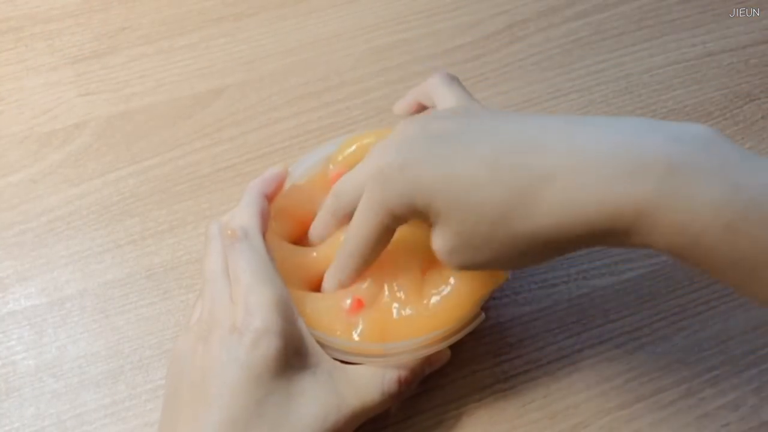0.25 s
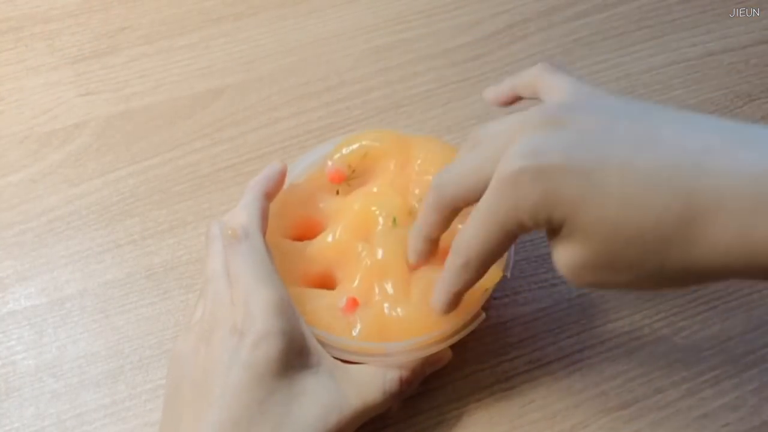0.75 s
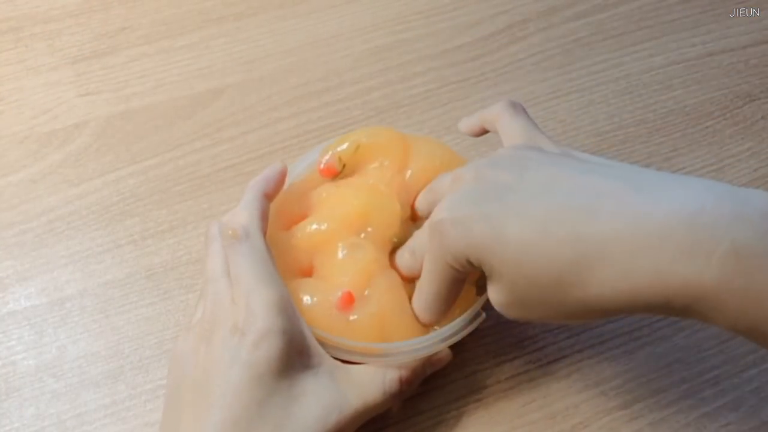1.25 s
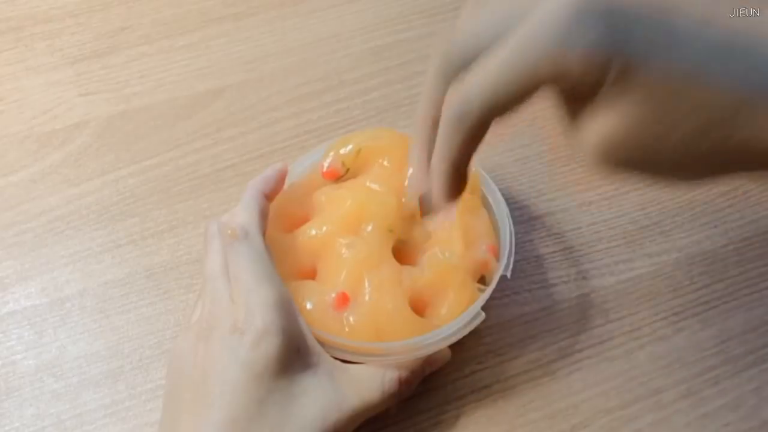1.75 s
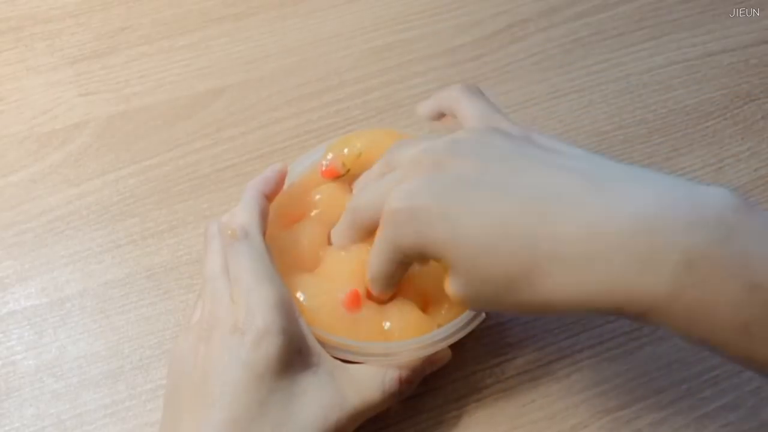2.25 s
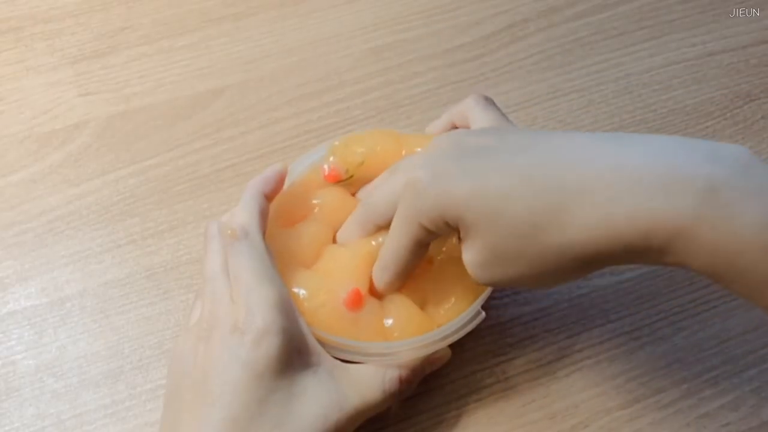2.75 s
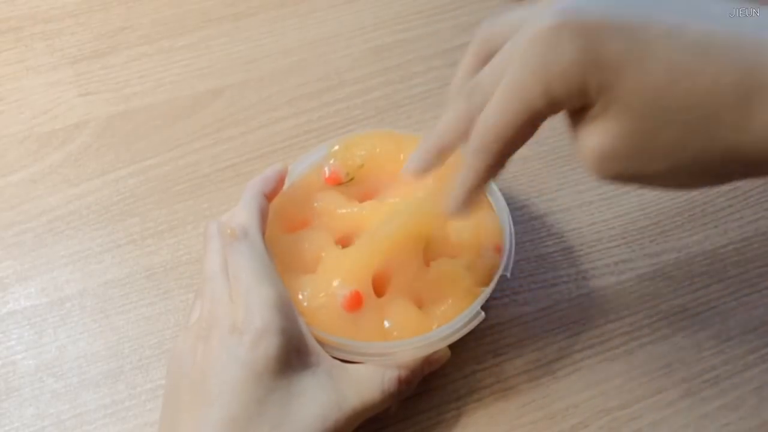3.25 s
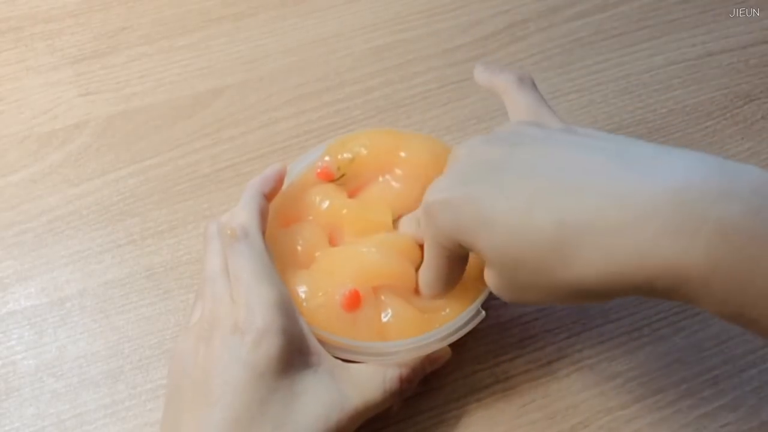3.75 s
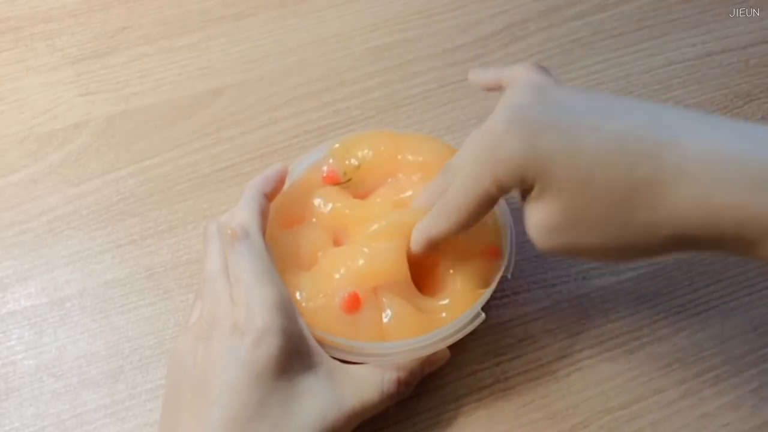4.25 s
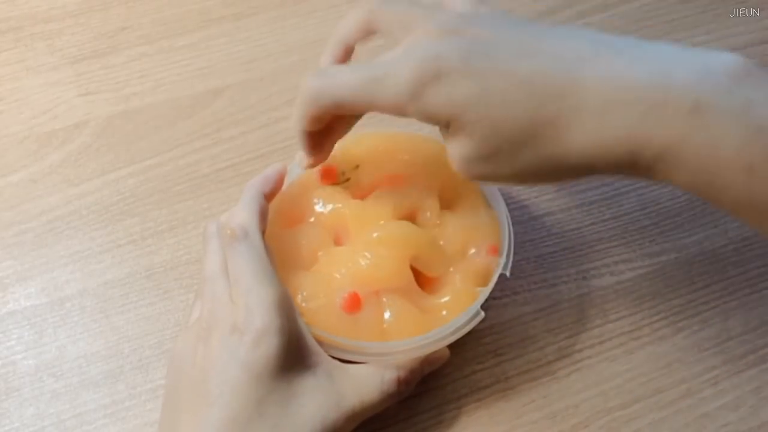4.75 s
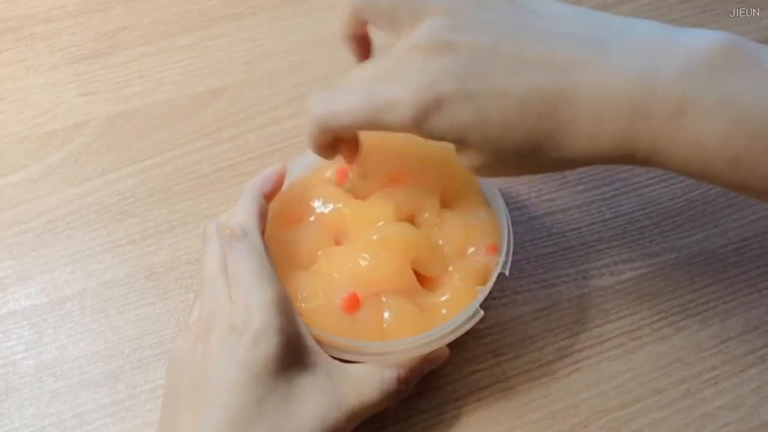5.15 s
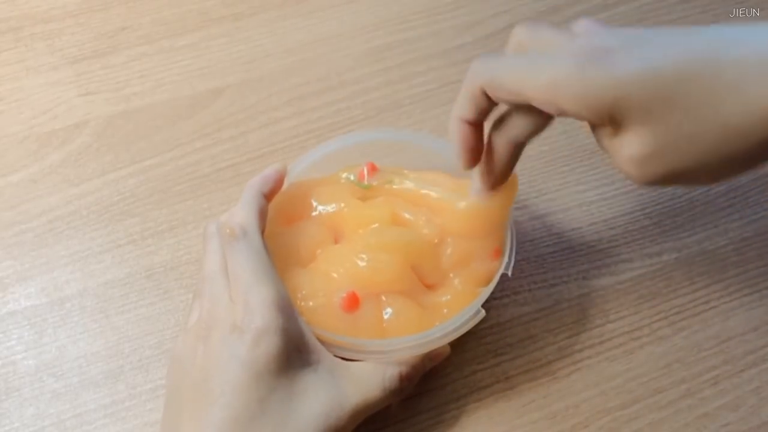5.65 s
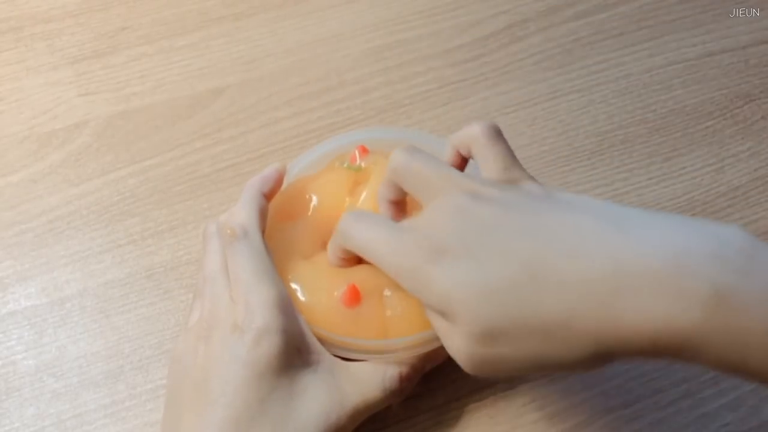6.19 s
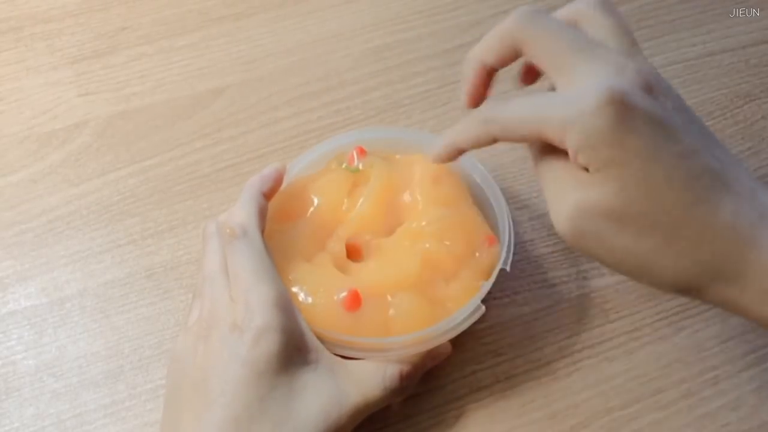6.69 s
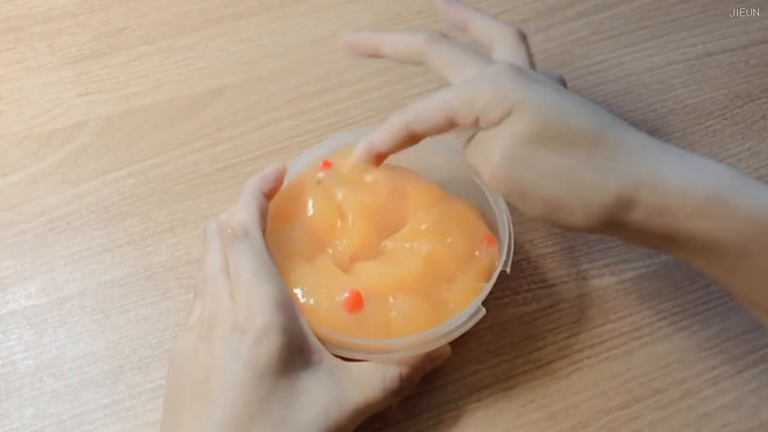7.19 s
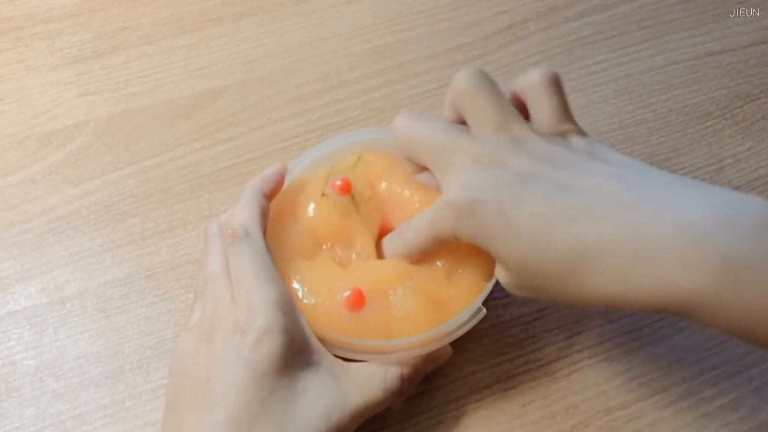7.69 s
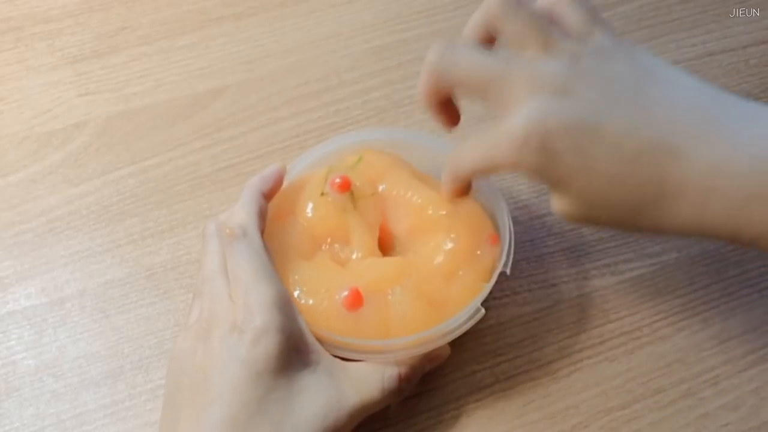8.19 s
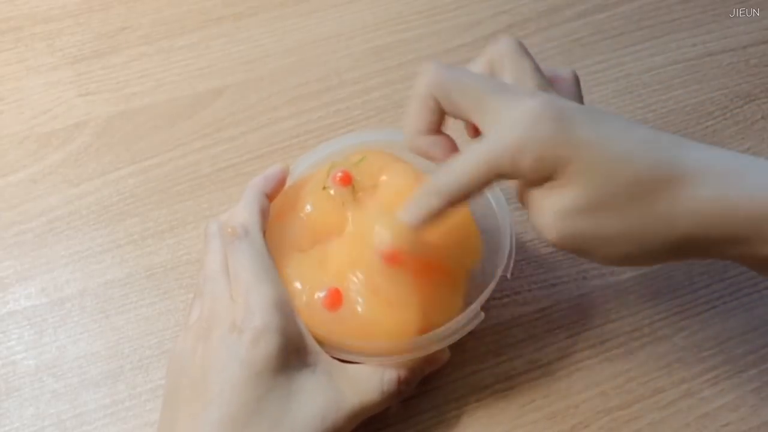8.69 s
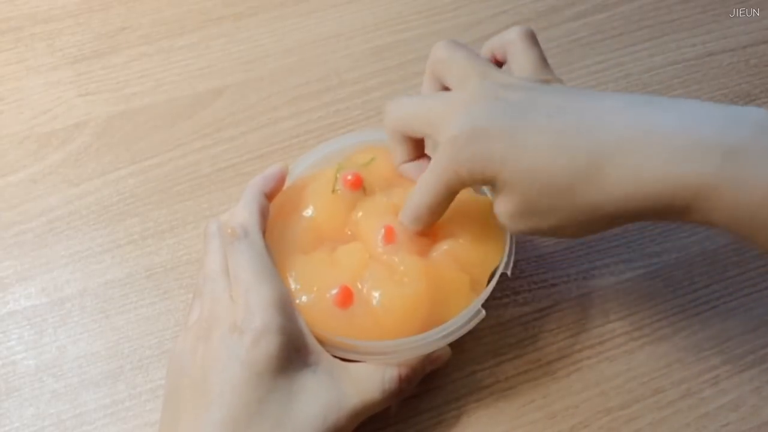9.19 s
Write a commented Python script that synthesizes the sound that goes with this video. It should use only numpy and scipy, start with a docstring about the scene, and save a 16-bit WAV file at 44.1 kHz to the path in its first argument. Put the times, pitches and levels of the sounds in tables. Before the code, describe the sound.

Close to the microphone in a small quiet room, fingers press and pull glossy slime in a plastic tub. Short hollow pops fall in pitch, mixed with bubbly, sticky crackling and tiny bright snaps. The strongest plop comes around two seconds, with tight bursts near six and eight seconds. Soft low bumps of the tub on the table accompany pokes, over faint rumble and air.

```python
"""Pops of wet slime, poked and pulled by fingers in a plastic tub on a table, close by in a small room.
Each pop is a film of slime tearing over an air pocket, which rings and falls in pitch as it empties.
Between the pops the slime crackles as it peels off skin and plastic: many tiny bubbles ring briefly.
Thin threads snap as short bursts of bright noise, and the tub bumps on the table as low, dying noise.
Under it all lie the table's low rumble and still air, both made of coloured noise."""
import sys
import numpy as np
from scipy import signal
from scipy.fft import rfft, irfft, next_fast_len
from scipy.io import wavfile

SR = 44100
rng = np.random.default_rng(int(sys.argv[2]) if len(sys.argv) > 2 else 0)


def pcm_store(signal):
    """Save signal as 16-bit PCM."""
    levels = np.round(np.clip(np.atleast_2d(signal), -1, 1) * 32767)
    wavfile.write(sys.argv[1], SR, levels.astype(np.int16).T)


N = 415863
TIME = np.arange(N) / SR
POP_S = .006   # levels of pops, films and threads are averages over this time
CUTOFF_HZ = 16000   # top of the sound

# The larger air pockets bursting, levels before tub and room are added:
# [t/s, pocket f/Hz, pocket level/dB, tear f/Hz, tear level/dB, spray level/dB]
POCKET_BURSTS = [(0.0833, 1290, -54, 3660, -50, -54), (0.1292, 2300, -36.5, 4100, -64, -64),
                 (0.1387, 1840, -35.5, 5000, -33.5, -44), (0.1412, 1220, -34, 4080, -34, -38.5),
                 (0.172, 2330, -44, 5000, -60, -69), (1.0307, 1030, -42, 3740, -37, -42),
                 (1.0344, 550, -40, 3470, -38, -47), (1.3266, 1140, -32, 3200, -40, -36),
                 (1.5324, 876, -25.5, 4500, -24.5, -33.5), (2.0176, 642, -17.5, 1670, -32.5, -54),
                 (2.0173, 1570, -24, 6500, -30, -50), (2.204, 1120, -46, 2670, -53.5, -63),
                 (2.713, 4570, -60, 7600, -63, -63), (2.7261, 1134, -33.5, 2780, -47, -49),
                 (2.774, 965, -30, 6240, -42.5, -43), (2.791, 720, -51, 3140, -43.5, -45),
                 (2.8731, 2350, -48, 4830, -68, -72), (3.395, 860, -50, 2970, -51, -56),
                 (3.8666, 1120, -41, 2290, -64, -75), (4.044, 1020, -35, 2550, -35.5, -48),
                 (4.0621, 1090, -37.5, 4100, -35, -33.5), (4.0662, 1070, -34.5, 3600, -34.5, -42),
                 (4.1428, 1810, -44.5, 3760, -46, -46), (4.593, 1330, -50, 3350, -55.5, -60),
                 (4.7715, 1180, -38, 3100, -32, -50), (4.8853, 605, -40, 2230, -45, -56),
                 (5.286, 2660, -32.5, 3160, -44, -51), (5.3204, 2950, -39.5, 5200, -58, -56),
                 (5.6796, 3430, -38, 6900, -43.5, -50), (5.9119, 2780, -32.5, 3900, -40, -46.5),
                 (5.95, 1420, -48, 3100, -45, -57), (5.9748, 1370, -45, 3500, -50.5, -62),
                 (5.9915, 1380, -44, 3400, -45, -64), (6.292, 1370, -32, 5000, -27, -59),
                 (6.294, 1190, -23.5, 3120, -31.5, -43), (6.3063, 1270, -34.5, 3440, -40, -54),
                 (6.315, 1114, -28, 2420, -33.5, -40), (6.3183, 1100, -26.5, 3680, -40, -43),
                 (6.323, 648, -33.5, 2430, -47, -48), (6.7, 1520, -56, 3280, -58, -83),
                 (7.075, 1286, -42, 2490, -68, -59), (7.092, 513, -49, 3080, -51.5, -52),
                 (7.4567, 1110, -52.5, 4000, -46.5, -66), (7.657, 1290, -48.5, 2530, -57.5, -83),
                 (7.7248, 1260, -45.5, 2300, -60, -56), (7.78, 1250, -43, 6950, -21.5, -27),
                 (7.7829, 1280, -28.5, 6000, -24.5, -36), (7.7865, 1290, -26, 6400, -21.5, -28),
                 (7.845, 1440, -42, 3120, -63, -63), (7.9291, 1240, -40.5, 2330, -48, -54.5),
                 (8.07, 1270, -51.5, 3420, -60.5, -61), (8.1852, 3000, -46.5, 6000, -57.5, -74),
                 (9.1023, 1060, -33.5, 2280, -32.5, -53.5), (9.114, 1106, -30, 2210, -44, -44),
                 (9.1291, 1038, -28.5, 2210, -55, -48), (9.1543, 632, -26.5, 2910, -39, -46.5)]
# The tub pushed against the table: [t/s, boom of the tub level/dB, shaking of the table level/dB]
TUB_BUMPS = [(0.278, -55, -56), (1.036, -49, -58), (1.327, -44.5, -57), (1.581, -47.5, -62),
             (2.019, -37.5, -44), (2.2, -44, -63), (2.773, -42.5, -57), (3.394, -54, -55),
             (3.62, -61.5, -50.5), (4.147, -50, -57), (4.288, -49.5, -46), (4.6, -57.5, -52),
             (4.771, -42.5, -62), (4.88, -49.5, -51), (5.02, -51, -71), (5.952, -48, -59), (6.3, -55, -52),
             (6.439, -74, -54), (7.075, -45, -63), (7.458, -55, -66), (7.787, -49.5, -48),
             (7.998, -45.5, -61), (8.766, -40, -48.5), (9.129, -45, -55)]
# Slime peeling as a finger pulls: [start t/s, end t/s, base level/dB, wetness/dB]
FINGER_PULLS = [(0.075, 0.158, -54.5, 1.5), (0.162, 0.297, -51, 0.5), (0.553, 0.89, -73, -1),
                (1.05, 1.046, -45, -6), (1.349, 1.557, -58.5, -3), (2.677, 2.735, -64.5, -2),
                (2.78, 2.946, -57, -0.5), (3.079, 3.16, -67, -6), (3.368, 3.444, -60, -5),
                (3.797, 3.935, -62.5, -1.5), (4.124, 4.224, -56, -1.5), (4.241, 4.32, -55.5, -1.5),
                (4.578, 4.696, -65, 3.5), (4.755, 4.778, -57, 8), (4.906, 5.016, -57, 0),
                (4.98, 5.178, -62.5, -0.5), (5.194, 5.346, -57.5, -1.5), (5.375, 5.555, -64, 0.5),
                (5.554, 5.669, -60.5, 2.5), (5.932, 6.041, -56.5, -1.5), (6.264, 6.317, -40, 2.5),
                (6.3, 6.394, -50.5, -3), (6.775, 6.859, -59, -0.5), (6.868, 7.011, -59, -2),
                (7.024, 7.129, -53.5, 7), (7.209, 7.44, -74, -4), (7.45, 7.483, -53.5, 0),
                (7.71, 7.816, -52, 5), (7.832, 7.875, -47, 4), (8.12, 8.21, -65, -5),
                (8.205, 8.303, -54, 0), (8.314, 8.389, -58, 2), (8.399, 8.555, -52, 0.5),
                (8.635, 8.81, -66.5, 4.5), (9.084, 9.183, -49.5, 0.5), (9.218, 9.24, -58.5, -8.5),
                (9.377, 9.42, -56.5, 8.5)]


def from_db(db):
    """Turn decibels into a gain."""
    return 10 ** (np.asarray(db) / 20)


def rms_one(x):
    """Scale a sound to an average (rms) level of 1."""
    return x / np.sqrt(np.mean(x ** 2) + 1e-20)


def at_level(x, db, seconds):
    """Give a burst the energy of a steady sound of that level and length."""
    return x * from_db(db) * np.sqrt(seconds * SR / (np.sum(x ** 2) + 1e-20))


def at_hz(points, hz):
    """Read each column of a spectrum at these frequencies, along a logarithmic pitch scale."""
    known_hz, *columns = np.transpose(points)
    return [np.interp(np.log(hz + 1e-3), np.log(known_hz), column) for column in columns]


def butter(x, hz, kind, order=2):
    """Keep the lows, the highs or a band of a sound with a smooth (Butterworth) filter."""
    return signal.sosfilt(signal.butter(order, hz, kind, fs=SR, output="sos"), x)


def noise(spectrum, size=N):
    """Make noise of a given colour, rms 1, by shaping the spectrum of white noise."""
    padded = next_fast_len(size)
    level_db, = at_hz(spectrum, np.fft.rfftfreq(padded, 1 / SR))
    white = rfft(rng.standard_normal(padded))
    return rms_one(irfft(white * from_db(level_db), padded)[:size])


def wander(per_s):
    """Draw a slow random curve around 0 by joining random points, this many a second."""
    return np.interp(TIME * per_s, np.arange(2000), rng.standard_normal(2000))


def add(out, s, sound):
    """Mix a sound in at time s, cut off at the end of the scene."""
    start = round(s * SR)
    out[start:start + len(sound)] += sound[:N - start]


def still_air(level_db=-58.5):
    """Still air is steady soft noise, strongest in the lows."""
    # Colour of the air: [f/Hz, level per Hz/dB]
    air_colour = [(20, 1), (50, -3), (120, -4), (220, -10), (450, -11.5), (800, -19), (2000, -23.5),
                  (5000, -29.5), (9000, -34), (16000, -42.5)]
    return from_db(level_db) * noise(air_colour)


def room(x, first_s=0.00032, build_s=0.00088, count=12):
    """Walls answer with a few near reflections and a short blurred tail, dying at its own rate in each band."""
    # The room's ring: [f/Hz, time to fall by 60 dB/s, level/dB]
    room_ring = [(149, 0.46, -9.5), (400, 0.15, -1.5), (1013, 0.22, -9), (2430, 0.22, -6.5),
                 (6060, 0.14, -10), (15000, 0.28, -10.5)]
    # Reflections off table and hand: [delay t/s, gain]
    near_echoes = [(.0007, 0.03), (.0027, 0.031), (.0068, 0.086), (0.0098, 0.03)]
    t = TIME[:SR // 2]
    response = np.zeros(len(t))
    onset = 1 - np.exp(-np.maximum(t - first_s, 0) / build_s)
    edges_hz = np.geomspace(80, CUTOFF_HZ, count + 1)
    for low, high in zip(edges_hz, edges_hz[1:]):
        t60, level_db = at_hz(room_ring, np.sqrt(low * high))
        decay = np.exp(-np.log(1000) * t / t60)
        tail = butter(rng.standard_normal(len(t)) * onset * decay, [low, high], "band")
        # a wider band gets more energy
        response += tail * from_db(level_db) * np.sqrt(2 * (high - low) / SR / np.sum(tail ** 2))
    for delay_s, gain in near_echoes:
        response[round(delay_s * SR)] += gain
    return x + signal.fftconvolve(x, response)[:N]


def rumble(rest_db=-60.5, shake_s=0.039, table_hz=130):
    """The table trembles under resting hands; after each bump its shaking swells for shake_s and dies away."""
    # Colour of the shaking table: [f/Hz, level per Hz/dB]
    table_colour = [(15, -13.5), (28, 5.5), (40, -9), (55, 1), (75, -12), (110, -8), (170, -27.5),
                    (400, -64)]
    strength = np.full(N, from_db(rest_db))
    age = TIME[:SR] / shake_s
    for s, _, shake_db in TUB_BUMPS:
        add(strength, s, from_db(shake_db) * age * np.exp(1 - age))
    return strength * butter(noise(table_colour), table_hz, "low")


def bumps(rise_s=0.0014, decay_s=0.036, with_pop_s=.02, jolt_hz=362, push_hz=149):
    """Soft pushes make the tub boom as low noise; the jolt of a pop reaches higher."""
    # Colour of the booming tub: [f/Hz, level per Hz/dB]
    tub_colour = [(30, -19.5), (70, -7.5), (115, 1), (150, -4), (200, -13), (260, -4), (350, -5.5),
                  (600, -3), (1200, -27)]
    out, t = np.zeros(N), TIME[:16384]
    push = (1 - np.exp(-t / rise_s)) * np.exp(-t / decay_s)
    for s, boom_db, _ in TUB_BUMPS:
        near_pop = any(abs(s - burst[0]) < with_pop_s for burst in POCKET_BURSTS)
        top_hz = jolt_hz if near_pop else push_hz
        boom = butter(noise(tub_colour, size=len(t)) * push, top_hz, "low")
        add(out, s, at_level(boom, boom_db, decay_s))
    return out


def tub(x, ring_db=-6.0, width_hz=36):
    """The plastic tub rings briefly at its own pitches with whatever happens in the slime."""
    # The walls and hollow of the tub: [f/Hz, level relative to ring_db/dB]
    tub_pitches = [(360, -3), (716, -5.5), (898, 1), (1033, -14.5), (1137, 2), (1626, -6.5), (4501, -5.5),
                   (6325, -8.5), (7098, 8)]
    out, r = x.copy(), np.exp(-np.pi * width_hz / SR)
    for hz, db in tub_pitches:
        poles = [1, -2 * r * np.cos(2 * np.pi * hz / SR), r * r]
        # the tiny offset keeps the filter quick in silence
        ring = (1 - r * r) / 2 * signal.lfilter([1, 0, -1], poles, x + 1e-18)
        out += from_db(db + ring_db) * ring
    return out


def grains(spectrum, per_s, uneven_db, cycles, clump_db=0.5, clumps_per_s=45, count=20):
    """Tiny bubbles break in clumps, each ringing for a few cycles at one of count pitches; rms 1."""
    out = np.zeros(N)
    for hz in np.geomspace(spectrum[0][0], spectrum[-1][0], count):
        # a bubble may break at every 8th sample
        chance, size, sign = rng.random((3, N // 8))
        breaks = 1e-12 + (chance < per_s * 8 / count / SR)   # never quite silent
        sizes = from_db(uneven_db * np.minimum(-np.log(size + 1e-9), 4)) * np.sign(sign - .5)
        clicks = np.zeros(N)
        clicks[:8 * len(sizes):8] = sizes * breaks
        # each ring falls by 60 dB in the given number of cycles
        r, w = np.exp(-np.log(1000) * hz / (cycles * SR)), 2 * np.pi * hz / SR
        rings = signal.lfilter([1, 0, -1], [1, -2 * r * np.cos(w), r * r], clicks)
        level_db = at_hz(spectrum, hz)[0] + clump_db * wander(clumps_per_s)
        out += rms_one(rings) * np.sqrt(hz) * from_db(level_db)   # higher pitches stand for wider bands
    return rms_one(out)


def peeling(swell_db=3.0, edge_s=0.013, catches_per_s=70, catch_db=2.5, gap_span=1.3, gap_db=-2.5):
    """A pull grows louder until the slime lets go; it catches on the way, and the gap under the finger colours it."""
    # Colours of bubbles, sticky crackle and fine fizz: [f/Hz, level per Hz/dB]
    bubble_colour = [(620, -2), (900, -10), (1300, -2), (2000, -8)]
    crackle_colour = [(2100, -3), (3200, -7.5), (5000, -7.5), (7800, -5)]
    fizz_colour = [(8000, -8), (11000, 0.5), (15500, -9.5)]
    wet_db, fizz_db = -1.5, -4.5   # bubbles and fizz against the crackle, at wetness 0
    gap_base_hz, gap_octave_db = 3060, 5   # resonance at wetness 0; wetness that lowers it by an octave
    out = np.zeros(N)
    bubbles = grains(bubble_colour, per_s=1300, uneven_db=3.5, cycles=9.0, clump_db=3.0, count=10)
    bubbles = butter(bubbles, 2800, "low")
    crackle = grains(crackle_colour, per_s=1900, uneven_db=2.5, cycles=9.8, clump_db=4.0, count=12)
    crackle = butter(crackle, 9500, "low")
    fizz = butter(grains(fizz_colour, per_s=2000, uneven_db=3.5, cycles=17.0, count=8), 6000, "high")
    for start, end, db, wetness_db in FINGER_PULLS:
        # a pull lasts at least 10 ms
        span = slice(round(start * SR), round(max(end, start + .01) * SR))
        t = TIME[span] - TIME[span][0]
        fade = np.clip(np.minimum(t, t[-1] - t) / edge_s, 0, 1)
        stroke = from_db(db + swell_db * (t / t[-1] - 2.0)) * fade
        gap_hz = gap_base_hz * 2 ** (-wetness_db / gap_octave_db)
        in_gap = butter(crackle[span], [gap_hz / gap_span, gap_hz * gap_span], "band", order=1)
        sticky = rms_one(crackle[span] + from_db(gap_db) * in_gap)
        # wetter slime bubbles more and fizzes less
        wet = from_db(wet_db + wetness_db) * rms_one(bubbles[span])
        fine = from_db(fizz_db - wetness_db) * rms_one(fizz[span])
        add(out, start, stroke * (wet + sticky + fine))
    return out * from_db(catch_db * wander(catches_per_s))


def rip(t, length_s, linger=1.9, even=0.19):
    """A film gives way in a quick run of tiny snaps, with a partly evened-out spectrum."""
    snaps = rng.standard_normal(len(t)) * np.exp(-(t / (2 * linger * length_s)) ** 2)
    spectrum = rfft(snaps)
    evened = irfft(spectrum / (np.abs(spectrum) + 1e-9) ** even, len(t))
    # evening smears the sound around its start: shift it by 8 samples and drop the second half
    return np.roll(evened, 8) * (t < t[-1] / 2)


def film(t, rip_hz, rip_db, fine_db, tear_span=1.324, tear_top_hz=8500,
         spray_hz=11500, thin_db=50.5, spray_span=1.37):
    """A film rips, the faster the louder the burst, and throws a fine spray."""
    tear_s, tear_halves_db = 0.0006, 28.5   # tearing time at -40 dB; this much louder takes half the time
    rip_s = tear_s * 2 ** (-(max(rip_db, fine_db) + 40) / tear_halves_db)
    tear = butter(rip(t, rip_s), [rip_hz / tear_span, rip_hz * tear_span], "band", order=1)
    tear = butter(tear, [450, min(tear_top_hz, 2.34 * rip_hz)], "band")
    # a thin film gives more spray than tear, and a higher one
    fine_hz = np.clip(spray_hz * 2 ** ((fine_db - rip_db) / thin_db), 9000, 14000)
    spray = butter(rip(t, rip_s), [fine_hz / spray_span, fine_hz * spray_span], "band")
    return at_level(tear, rip_db, POP_S) + at_level(spray, fine_db, POP_S)


def threads(thread_hz=4170):
    """A stretched thread snaps with a bright tick and no ring, as no air lies behind it."""
    # Threads of slime snapping: [t/s, tear level/dB, spray level/dB]
    thread_snaps = [(0.438, -59, -66), (1.45, -55, -52), (2.046, -59, -52), (3.184, -59.5, -61),
                    (3.455, -59, -51), (3.6033, -57, -57), (3.8261, -60, -48), (3.906, -55, -72),
                    (4.278, -47.5, -42), (5.4867, -67, -54), (5.597, -53, -56), (7.041, -49, -47.5),
                    (7.243, -71, -55), (7.7741, -37, -35), (8.3862, -47.5, -37)]
    out, t = np.zeros(N), TIME[:2048]
    for s, rip_db, fine_db in thread_snaps:
        add(out, s, film(t, thread_hz, rip_db, fine_db))
    return out


def pocket(t, hz, closed_db=0.0, fall=0.61, settle=1.83, slosh_db=-3.0, slosh_low=0.44, slosh_high=1.585):
    """An air pocket rings for a few cycles and sinks in pitch; its wet walls make the ring ragged."""
    base_ring_s, size_power = .0011, 0.88   # for pockets up to 1 kHz; smaller, higher ones die sooner
    ring_doubles_db = 16.0   # a pocket this much louder than its tear stays nearly closed, rings twice as long
    closed = 2 ** np.clip(closed_db / ring_doubles_db, -1, 1)
    ring_s = base_ring_s * closed / max(hz / 1000, 1) ** size_power
    age = t / ring_s
    pitch_hz = hz * np.exp(fall * (np.exp(-age / settle) - .42))
    swell = age * np.exp(-age)
    tone = swell * np.sin(2 * np.pi * np.cumsum(pitch_hz) / SR)
    slosh = butter(swell * rng.standard_normal(len(t)), [hz * slosh_low, hz * slosh_high], "band")
    return rms_one(tone) + from_db(slosh_db) * rms_one(slosh)


def small_pops(spread_octaves=0.65, count=12):
    """Pulls open up to count small pockets each at random moments, louder in a harder pull."""
    per_s, usual_hz = 20, 2600
    above_pull_db, spread_db = -0.5, 2
    out, t = np.zeros(N), TIME[:1024]
    for start, end, db, _ in FINGER_PULLS:
        times = start + np.cumsum(rng.exponential(1, count)) / per_s
        draws = rng.standard_normal((count, 2)).clip(-2, 2)
        for s, (size, pitch) in zip(times, draws):
            if s < end:
                ring = pocket(t, usual_hz * 2 ** (spread_octaves * pitch))
                add(out, s, at_level(ring, db + above_pull_db + spread_db * size, POP_S))
    return out


def straining(strain_db=-17.0, lead_s=.0025, strain_span=2.6):
    """Just before it gives way, each film creaks faintly, as a softer and broader run of snaps."""
    out, t = np.zeros(N), TIME[:1024]
    for s, _, _, rip_hz, rip_db, _ in POCKET_BURSTS:
        creak = butter(rip(t, lead_s), [rip_hz / strain_span, rip_hz * strain_span], "band")
        add(out, s - lead_s, at_level(creak, rip_db + strain_db, POP_S))
    return out


def pops():
    """In each burst the film rips and the pocket of air behind it rings."""
    out, t = np.zeros(N), TIME[:2048]
    for s, hz, db, rip_hz, rip_db, fine_db in POCKET_BURSTS:
        add(out, s, at_level(pocket(t, hz, closed_db=db - rip_db), db, POP_S))
        add(out, s, film(t, rip_hz, rip_db, fine_db))
    return out


def scene():
    """Slime and tub sound in the room, over the bumps, the table's rumble and still air."""
    slime = peeling() + threads() + small_pops() + straining() + pops()
    mix = still_air() + rumble() + bumps() + room(tub(slime))
    return mix[None]   # one channel


def record(dry):
    """Cut the top steeply above CUTOFF_HZ."""
    return signal.sosfilt(signal.ellip(10, .2, 80, CUTOFF_HZ, fs=SR, output="sos"), dry)


dry = scene()
out = record(dry)
pcm_store(out)
```